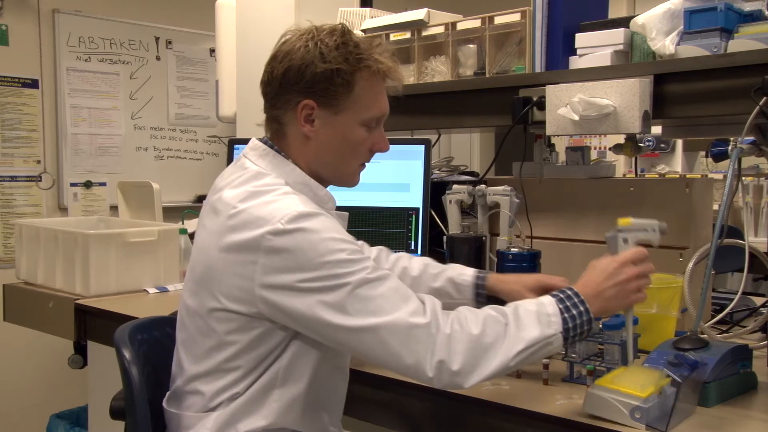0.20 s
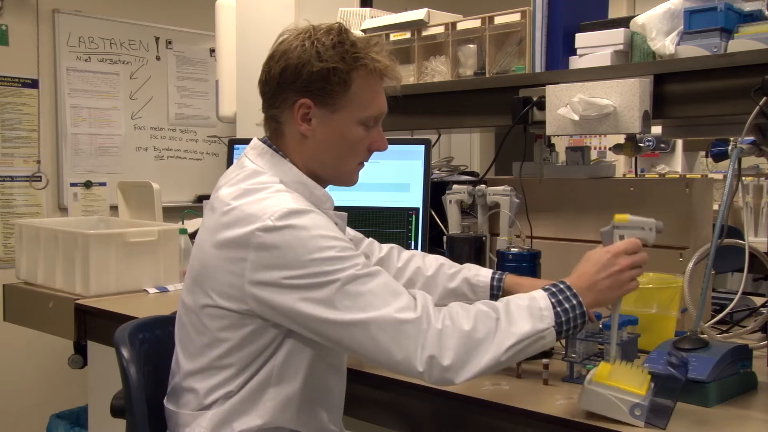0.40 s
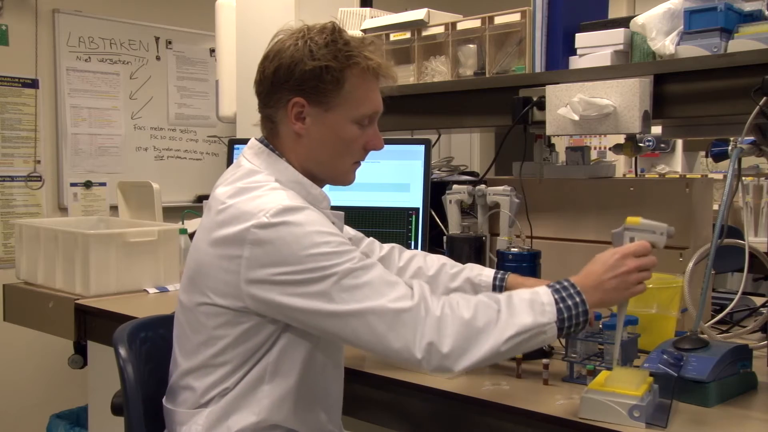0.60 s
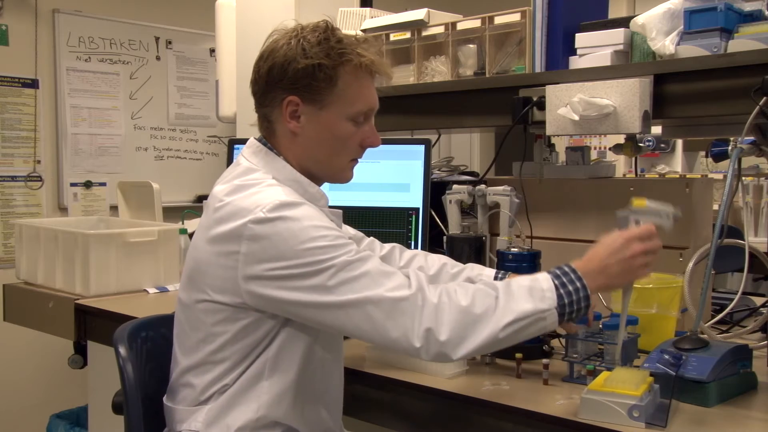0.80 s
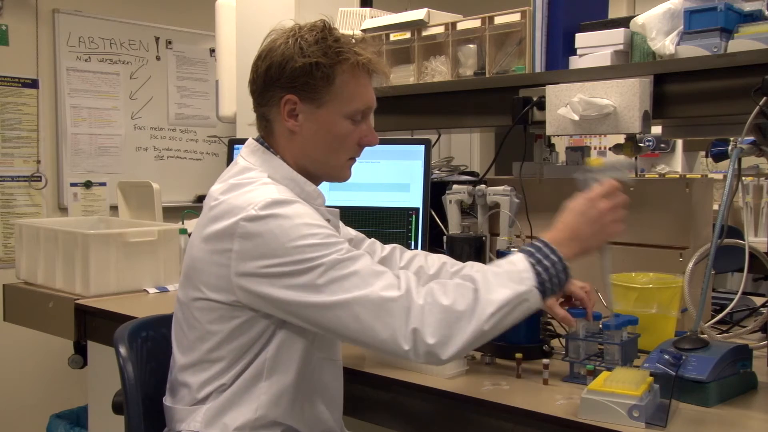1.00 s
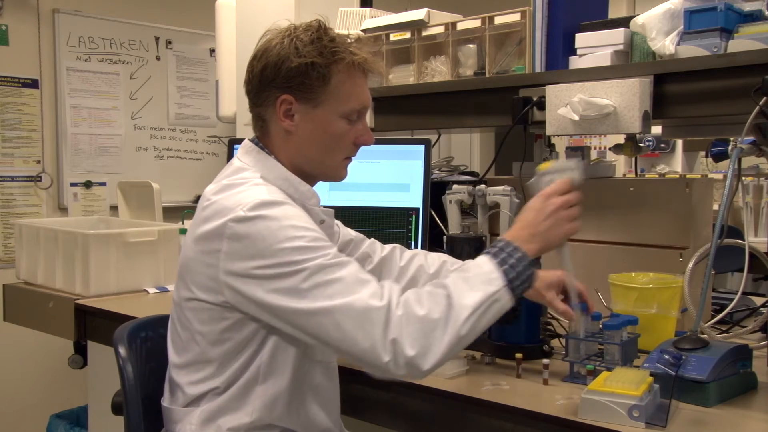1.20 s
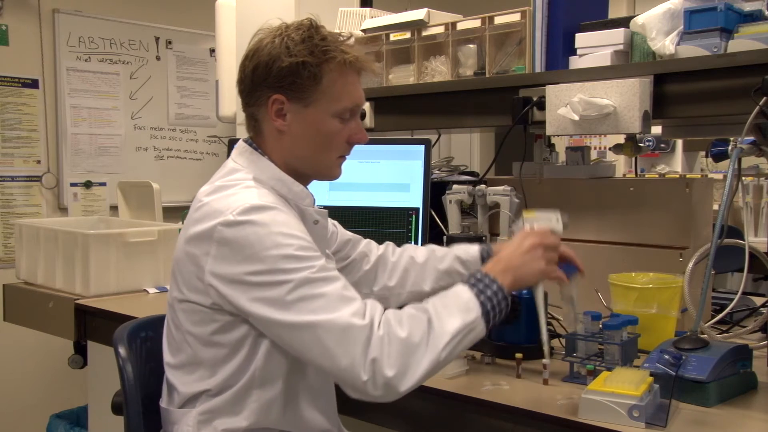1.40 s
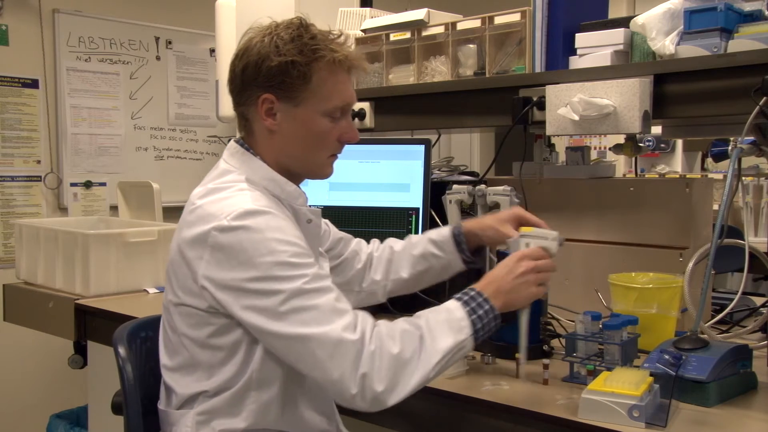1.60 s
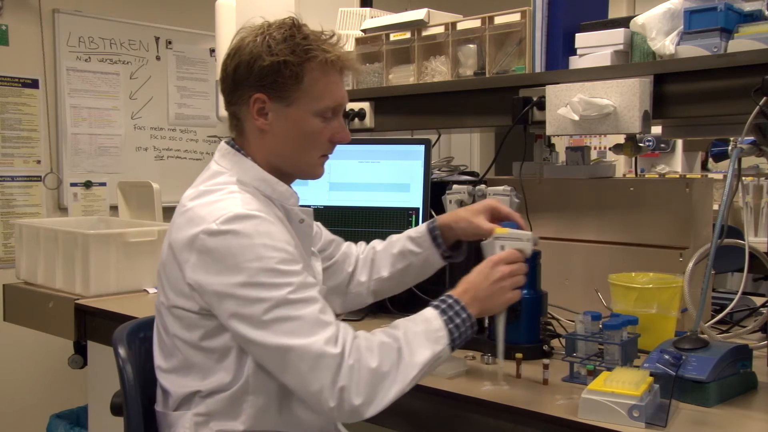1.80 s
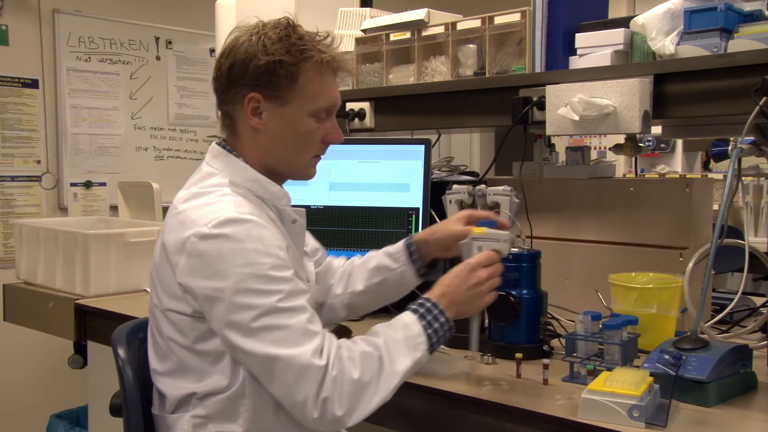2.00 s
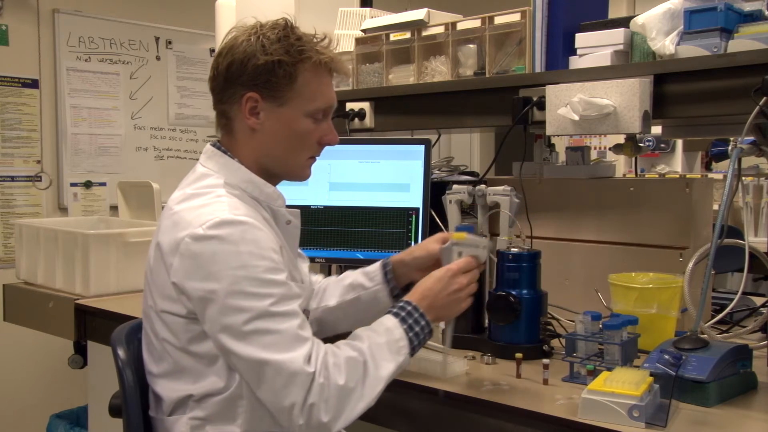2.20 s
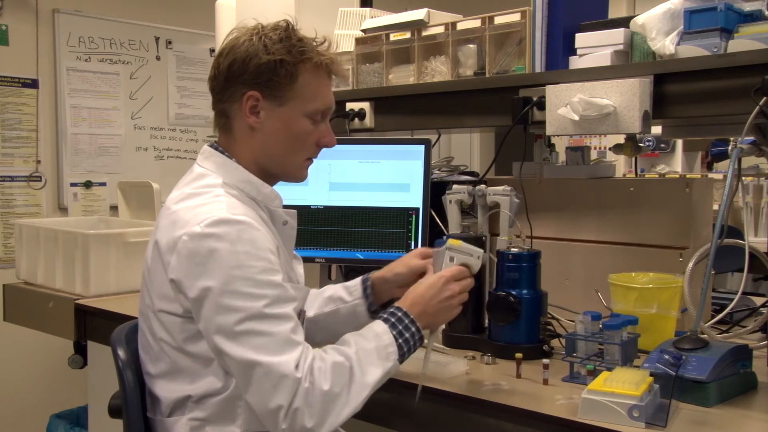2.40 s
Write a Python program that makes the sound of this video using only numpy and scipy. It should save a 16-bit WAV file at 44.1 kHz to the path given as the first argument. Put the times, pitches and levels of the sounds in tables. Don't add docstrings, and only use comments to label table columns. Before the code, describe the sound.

Hollow plastic rack knocked and scraped on a lab bench, then faint pipette ticks over hum

```python
import sys
import numpy as np
from scipy import signal
from scipy.fft import rfft, irfft
from scipy.io import wavfile
from scipy.ndimage import uniform_filter1d

SR = 44100
rng = np.random.default_rng(int(sys.argv[2]) if len(sys.argv) > 2 else 0)


def voltage_ratio(decibels):
    exponent = np.asarray(decibels, float) / 20
    return 10 ** exponent


def master_out(mix):
    frames = np.transpose(np.atleast_2d(mix))
    ceiling = np.clip(frames, -1, 1)
    pcm = np.round(ceiling * 32767).astype(np.int16)
    wavfile.write(sys.argv[1], SR, pcm)


N = 110250

TUBE_HZ = 826
# pitch_hz, side_db
PORT_DIFFERENCE = [(30, -8), (250, -28), (1400, -14.5), (3500, -11), (8000, -9.5), (11000, -0.5),
                   (12800, -4), (14500, -2.5)]


def level(x, db):
    return x * voltage_ratio(db) / np.sqrt(np.mean(x ** 2))


def colour(x, curve):
    hz, db = np.array(curve, float).T
    f = np.maximum(np.fft.rfftfreq(N, 1 / SR), 1)
    gain = voltage_ratio(np.interp(np.log(f), np.log(hz), db))
    return irfft(rfft(x) * gain, N)


def decay(t, t60):
    return np.exp(-np.log(1000) * t / t60)


def ring(hz, t60, size=16384):
    t = np.arange(size) / SR
    return np.sin(2 * np.pi * hz * t) * decay(t, max(t60, 0.004))


def add(out, start_s, x):
    i = int(start_s * SR)
    out[i:i + len(x)] += x[:N - i]


def walk(rate_hz):
    k = int(SR / rate_hz)
    smooth = uniform_filter1d(rng.standard_normal(N), k)
    return level(uniform_filter1d(smooth, k), 0)


def sleeve():
    # start_s, level_db, treble_db
    movement = [(0, -57, -3.5), (.15, -55.5, -0.5), (.23, -58, -3), (.4, -60, -3.5), (.7, -56.5, -21),
                (.8, -70.5, 0.5), (.93, -64, -9), (1.0, -84, -7), (1.3, -74.5, 8), (1.335, -71.5, 9.5),
                (1.372, -69.5, 8.5), (1.4, -78.5, 4.5), (1.9, -71, -2), (2.04, -63, -7.5), (2.09, -56, -9),
                (2.14, -65, -1.5), (2.27, -65.5, -1.5), (2.5, -64.5, -2.5)]
    # pitch_hz, density_db (dB per Hz)
    cloth = [(300, 5.5), (800, 0.5), (2000, -5.5), (4000, -12), (7000, -11.5), (8500, -19.5), (10500, -15),
             (15000, -30)]
    start_s, level_db, treble_db = np.array(movement).T
    grains = rng.standard_normal((2, N)) * voltage_ratio(1.66 * walk(220))
    rub = level(colour(grains, cloth), 0)
    dull = signal.lfilter(*signal.butter(2, 3500, fs=SR), rub)
    t = np.arange(N) / SR
    treble = (rub - dull) * voltage_ratio(np.interp(t, start_s, treble_db))
    return (dull + treble) * voltage_ratio(np.interp(t, start_s, level_db))


def machine():
    # pitch_hz, width_hz, level_db
    rumble = [(100.4, 51, -57), (128.4, 1.8, -67.5), (435.8, 4.7, -69), (772.4, 3.5, -74)]
    hum_hz, hum_db = 216.5, -47.5
    drift, wobble_db = 0.0012, 0.45
    phase = 2 * np.pi * np.cumsum(hum_hz * (1 + drift * walk(11.5))) / SR
    out = level(np.sin(phase), hum_db) * voltage_ratio(wobble_db * walk(22.0))
    for hz, width_hz, db in rumble:
        line = signal.lfilter(*signal.iirpeak(hz, hz / width_hz, fs=SR), rng.standard_normal(N))
        out = out + level(line, db)
    return out


def air():
    # pitch_hz, density_db (dB per Hz)
    ventilation = [(20, -12.5), (50, -7.5), (110, -6), (170, -13.5), (400, -16.5), (1500, -33.5),
                   (4000, -53.5), (9000, -55)]
    # pitch_hz, density_db (dB per Hz)
    thin_hiss = [(3000, -12), (8500, -13), (10000, 19), (12300, -17), (14500, 16), (15200, 4), (16000, -13)]
    rush = level(colour(rng.standard_normal((2, N)), ventilation), -53)
    hiss = level(colour(rng.standard_normal((2, N)), thin_hiss), -88)
    mid, side = rush + hiss
    return mid, colour(side, PORT_DIFFERENCE)


def taps():
    # start_s, level_db, pitch_hz, t60_s
    pushes = [(.102, -42, 407, 0.04), (.224, -39, 593, 0.2), (.243, -44, 628, 0.062), (.426, -34, 917, .04),
              (.432, -28.5, 595, 0.13), (.44, -41, 714, 0.15), (.474, -18, 910, 0.061),
              (.476, -20, 626, 0.12), (0.478, -38, 99, 0.17), (.498, -26.5, 1207, .12),
              (.5, -26, 984, 0.24), (.505, -40, 1097, 0.093), (.566, -36, 274, 0.095),
              (.625, -40, 607, .09), (.651, -37, 582, 0.12), (.682, -39.5, 581.4, 0.12),
              (.92, -45.5, 847, 0.031), (1.153, -42.5, TUBE_HZ, 0.18), (1.223, -37.5, TUBE_HZ, 0.12),
              (1.352, -45, 421, 0.13), (1.222, -41, 525, .04), (1.885, -41.5, 412, 0.063),
              (2.052, -42.5, 560, 0.022), (2.1, -45.5, 422, 0.029), (2.271, -43.5, 750, 0.018),
              (2.311, -62, 397, 0.021), (2.392, -43, 480, .05), (2.452, -42, 450, .027)]
    push_s = 0.00085
    out, t = np.zeros(N), np.arange(16384) / SR
    for start_s, db, hz, t60 in pushes:
        swell = 1 - np.exp(-t / push_s)
        add(out, start_s, voltage_ratio(db) * ring(hz, t60) * swell)
    return out


def grit_run(t, length_s):
    snags_per_s, spread_db, rise_s = 5000, 2.2, 0.0006
    chance, size = rng.random(len(t)), rng.exponential(size=len(t))
    white = rng.standard_normal(len(t))
    snags = (chance < snags_per_s / SR) * voltage_ratio(spread_db * size) * np.sign(white)
    rise = 1 - np.exp(-t / rise_s)
    fade = np.exp(-1.18 * t / length_s) * np.clip(4 - 3 * t / length_s, 0, 1)
    grit = (snags + 0.14 * white) * rise * fade
    return grit / np.sqrt(np.sum(grit ** 2))


def rack():
    # pitch_hz, level_db, t60_s
    body_modes = [(470, -4, 0.047), (578.6, -6.5, 0.24), (624, -4, 0.22), (706, -1, 0.045), (800, 0, 0.034),
                  (873, -8.5, 0.064), (923, -0.5, 0.043), (983, -4.5, 0.039), (1050, -1.5, 0.042),
                  (1208, -11.5, 0.039), (1290, -19.5, 0.037), (1473, -1, 0.021)]
    # pitch_hz, level_db, t60_s
    wall_modes = [(2337, 1, 0.013), (2610, -1, 0.0082), (3018, -3, 0.035), (3320, -10.5, 0.012),
                  (3720, -8, 0.023), (3890, -23, 0.027), (4230, -12, 0.035), (6320, -13, 0.01)]
    # start_s, length_s, level_db, favoured_hz, wall_db
    contacts = [(0.142, 0.016, -46, 910, -17), (0.156, 0.028, -43.5, 1000, -15),
                (0.193, 0.063, -39, 1050, -16), (0.2231, 0.029, -39.5, 620, -21),
                (0.283, 0.12, -45.5, 800, -25), (0.423, 0.011, -32, 840, -11.5),
                (0.438, 0.0133, -33.5, 646, -39), (.472, 0.0082, -21.5, 1000, -1.5),
                (0.4968, 0.0038, -28, 1050, -5), (0.503, 0.026, -26, 1050, -5),
                (0.516, 0.039, -27.5, 925, -19), (0.55, 0.014, -41, 700, -7),
                (0.5648, 0.0043, -23.5, 800, -12.5), (0.572, 0.011, -38, 1010, -6),
                (0.581, 0.02, -35, 910, -6), (0.593, 0.023, -41, 700, -1.5),
                (0.623, 0.015, -34.5, 660, -9.5), (0.639, 0.0098, -40, 600, -5),
                (0.654, 0.03, -49, 600, -14), (0.702, 0.032, -61, 580, -36)]
    # pitch_hz, density_db (dB per Hz)
    rattle = [(300, -0.5), (2000, -6), (3200, -8), (4200, -10.5), (4800, -18), (7000, -12.5), (7800, -31.5),
              (15000, -12)]
    rattle_db, rattle_t60_s, favour_octaves = 14.5, 0.033, 0.45
    out, loose, t = np.zeros(N), np.zeros(N), np.arange(4096) / SR
    walls = sum(voltage_ratio(db) * ring(hz, t60) for hz, db, t60 in wall_modes)
    rattle_decay = decay(t, rattle_t60_s) ** 2
    for start_s, length_s, db, favoured_hz, wall_db in contacts:
        grit = voltage_ratio(db) * grit_run(t, length_s)
        body = np.zeros(16384)
        for hz, mode_db, t60 in body_modes:
            distance = np.log2(hz / favoured_hz) / favour_octaves
            body += voltage_ratio(mode_db - 5.9 * distance ** 2) * ring(hz, t60)
        add(out, start_s, signal.fftconvolve(grit, body + voltage_ratio(wall_db) * walls))
        energy = np.abs(signal.fftconvolve(grit ** 2, rattle_decay))[:4096]
        add(loose, start_s, voltage_ratio(wall_db) * rng.standard_normal(4096) * np.sqrt(energy))
    out = out + voltage_ratio(rattle_db) * colour(loose, rattle)
    return signal.lfilter(*signal.butter(2, 260, "highpass", fs=SR), out)


def snaps():
    # start_s, peak_db, ring_hz,
    # ring_db, edge_hz
    ticks = [(0.2, -42, 6760, -10, 5000), (0.317, -54, 3040, -7, 4000), (0.36, -53, 4500, -7, 6000),
             (0.377, -52, 6000, -10, 6000), (0.4248, -45, 3010, 6, 4000), (0.4719, -31, 8900, -9, 11000),
             (0.4985, -30.5, 8800, -18, 10000), (0.55, -42, 13500, -12, 11000),
             (0.5658, -31, 8200, -19, 11000), (0.584, -26, 8900, -24, 10900), (0.628, -39, 6700, -2, 10000),
             (0.641, -44, 6940, -4, 9000), (0.7413, -53, 5000, -8, 5900), (0.889, -60, 5630, -2, 6100),
             (0.682, -40, 2520, -36, 5000), (0.7543, -43.5, 2980, -10, 4470),
             (0.821, -55.5, 6130, -3, 5000), (0.873, -56, 9100, -12, 9800), (.911, -47, 14800, 2, 16000),
             (0.9162, -47.5, 2440, -12, 5900), (0.919, -62, 5900, 7, 5000),
             (1.1509, -43, 11500, -13, 16000), (1.1732, -67, 8000, -12, 10000),
             (1.2215, -51, 2060, -9, 3970), (1.2896, -49.5, 3220, -12, 6500), (1.828, -58, 7500, -14, 9000),
             (1.98, -53, 3840, -2.5, 4000), (2.0528, -45.5, 3850, -2.5, 7000),
             (2.054, -62, 6750, -10, 12000), (2.066, -58, 1980, -10, 3500), (2.074, -57, 3110, -3, 3000),
             (2.082, -56.5, 4070, 2, 4500), (2.093, -59, 1500, -10, 3000), (2.085, -60, 6700, -3, 3500),
             (2.119, -60, 2980, -3, 3060), (2.101, -57, 3120, 0, 3000), (2.111, -61, 1800, -8, 3500),
             (2.2562, -62, 3860, 8, 4000), (2.2712, -44, 1270, -11, 3000), (2.272, -58, 9600, -10, 12000),
             (2.282, -67, 3930, 6, 4000), (2.378, -59, 3880, -4, 4000), (2.4523, -51, 3400, -7, 6130),
             (2.497, -53, 3500, -14, 6000)]
    crack_s, after_s, after_db, ring_cycles = 0.001, 0.0083, -10, 79
    out, t = np.zeros(N), np.arange(2048) / SR
    envelope = np.exp(-t / crack_s) + voltage_ratio(after_db) * np.exp(-t / after_s)
    for start_s, db, hz, ring_db, edge_hz in ticks:
        band = signal.butter(1, [edge_hz / 12, min(edge_hz * 1.5, 19000)], "bandpass", fs=SR)
        crack = signal.lfilter(*band, rng.standard_normal(2048) * envelope)
        crack = crack / np.abs(crack).max()
        chime = voltage_ratio(ring_db) * ring(hz, ring_cycles / hz, size=2048)
        add(out, start_s, voltage_ratio(db) * (crack + chime))
    return out


def room(near):
    t60_s, tail_db, dull_hz, build_s = 0.31, -14, 5000, 0.0041
    t = np.arange(16384) / SR
    tail = rng.standard_normal((2, 16384)) * decay(t, t60_s) * (1 - np.exp(-t / build_s))
    tail = signal.lfilter(*signal.butter(1, dull_hz, fs=SR), tail)
    tail = tail * voltage_ratio(tail_db) / np.sqrt(np.sum(tail[0] ** 2))
    return [signal.fftconvolve(near, h)[:N] for h in tail]


def scene():
    # pitch_hz, tilt_db (gained left and lost right)
    bench_pan = [(300, -1.5), (700, 0), (1300, -2.1), (2400, 2.8), (4400, 1)]
    rub, rub_side = sleeve()
    hum = machine()
    air_mid, air_side = air()
    near = taps() + rack() + snaps()
    wet, wet_side = room(near)
    mid = air_mid + wet + rub + hum
    side = air_side + colour(voltage_ratio(1.5) * wet_side + rub_side, PORT_DIFFERENCE)
    left = colour(near, bench_pan)
    right = colour(near, np.array(bench_pan) * [1, -1])
    return np.array([mid + side + left, mid - side + right])


def roll_off(x):
    return signal.sosfilt(signal.butter(12, 16340, fs=SR, output="sos"), x)


def record(dry):
    # pitch_hz, phase_rad
    port_phase = [(0, 0), (3000, 0.62), (5000, 1.0), (9500, 1.4), (11800, 3.5), (13300, 3.5), (14600, 3.5),
                  (16000, 3)]
    pan_db, top_hz = -0.63, 15200
    f = np.fft.rfftfreq(N, 1 / SR)
    lag = np.interp(f, *np.array(port_phase).T)
    late = irfft(rfft(dry[1]) * np.exp(-1j * lag), N)
    x = np.array([dry[0] * voltage_ratio(pan_db / 2), late * voltage_ratio(-pan_db / 2)])
    x = signal.sosfilt(signal.ellip(6, 0.2, 60, top_hz, fs=SR, output="sos"), x)
    return roll_off(x)


dry = scene()
out = record(dry)
master_out(out)
```